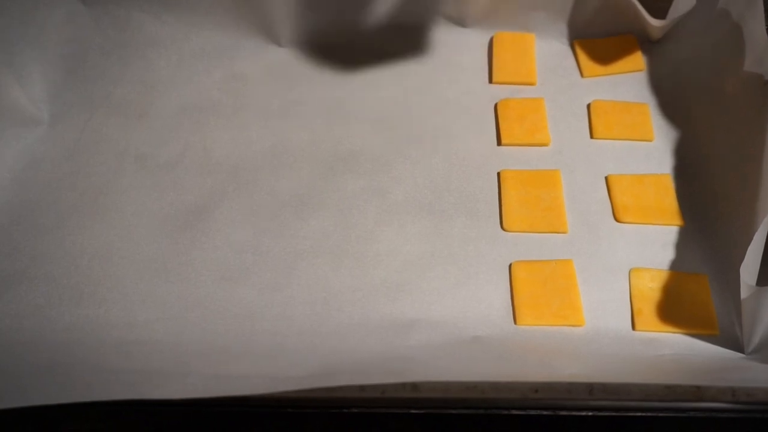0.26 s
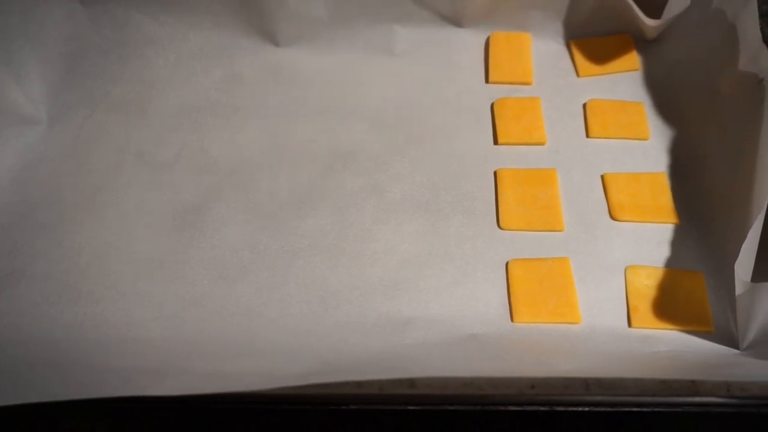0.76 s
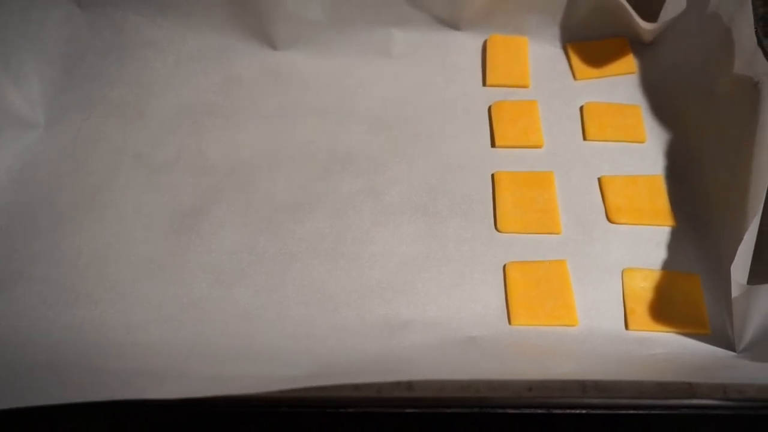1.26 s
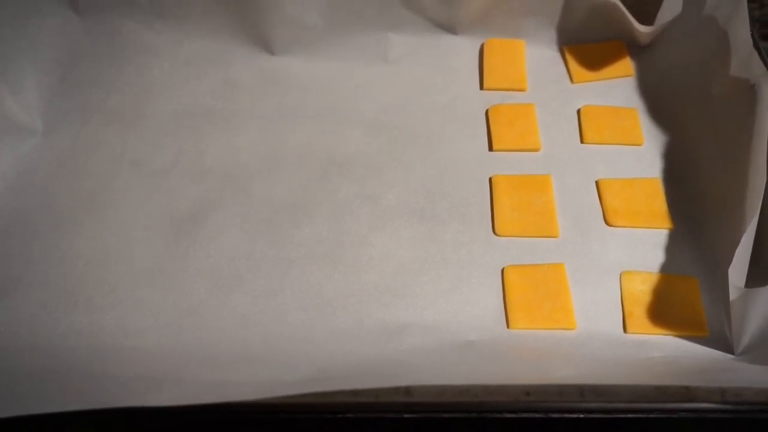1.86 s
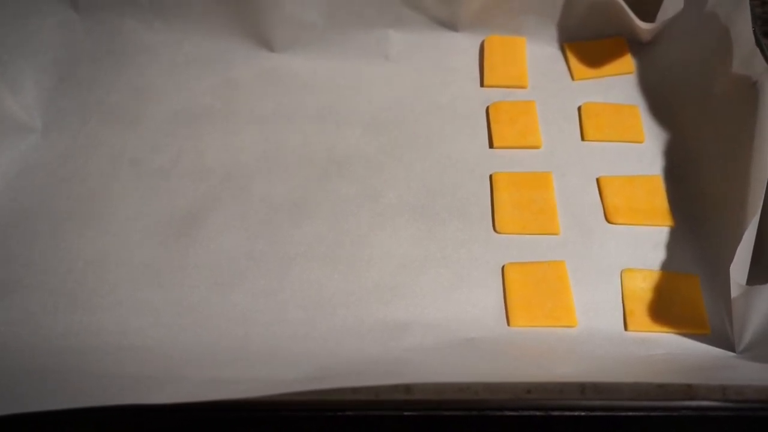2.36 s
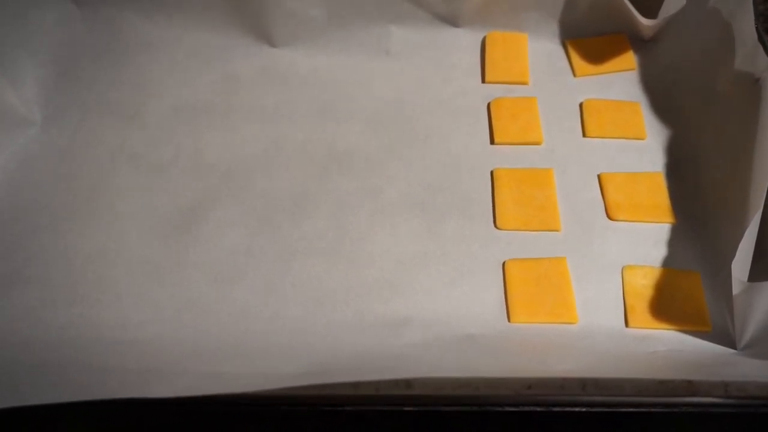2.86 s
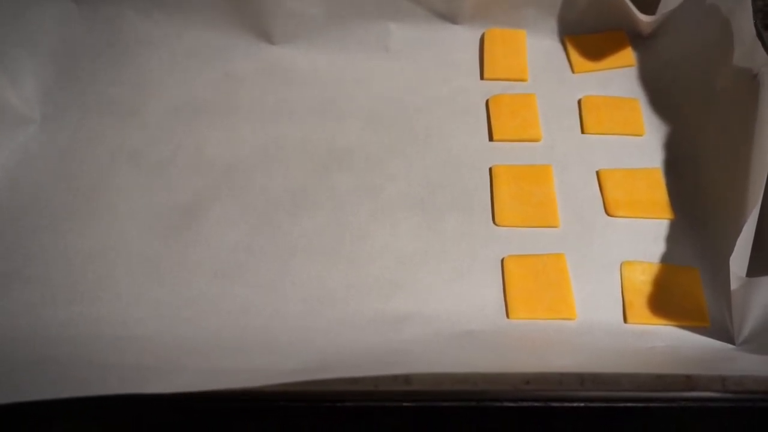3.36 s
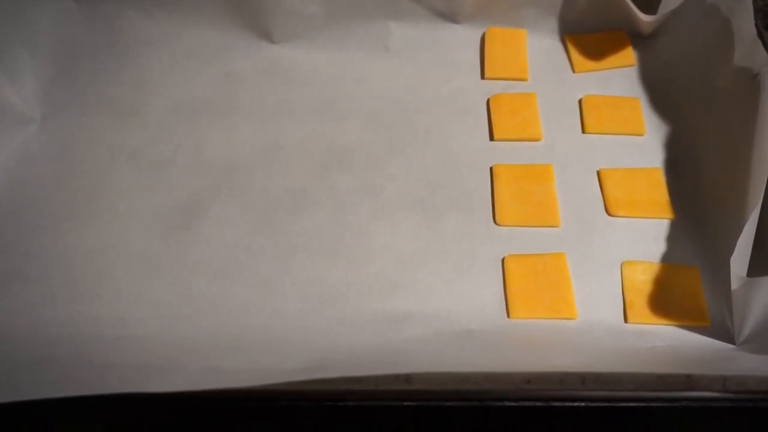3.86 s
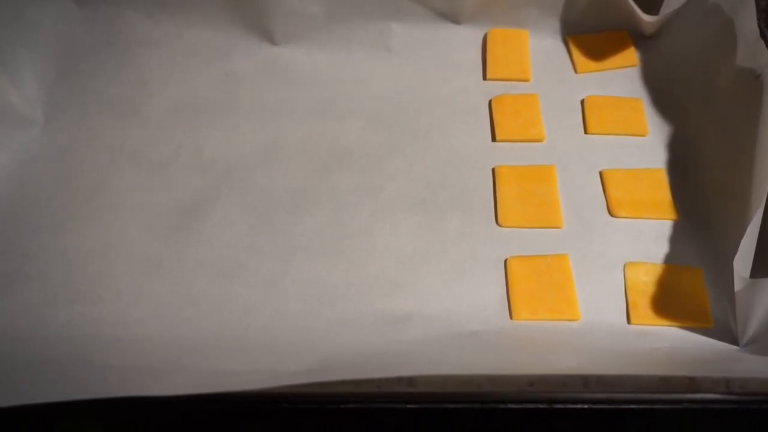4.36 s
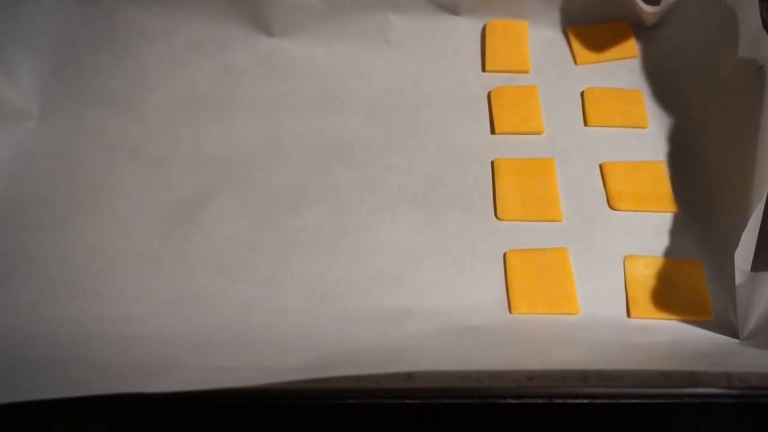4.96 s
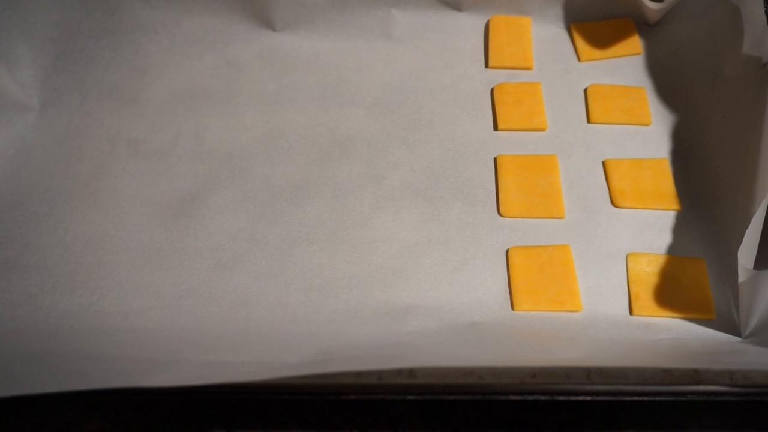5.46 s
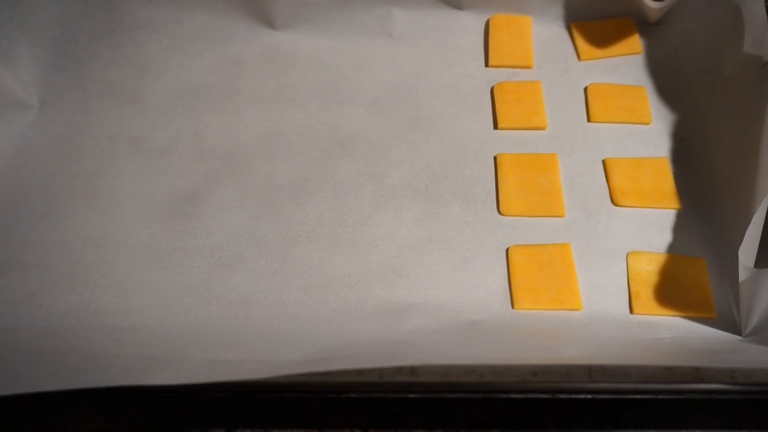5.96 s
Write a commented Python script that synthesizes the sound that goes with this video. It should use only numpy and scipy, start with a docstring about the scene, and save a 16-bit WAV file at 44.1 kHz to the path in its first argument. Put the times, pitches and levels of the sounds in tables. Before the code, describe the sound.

A quiet kitchen: soft air and a faint, wavering fridge hum run throughout, with short room reverberation. At about 0.1 s paper pops crisply, then again near 0.25 s together with dull low thuds of something set down, and a faint one at 0.4. From 0.7 to 2.4 s parchment slides softly with small dry ticks and brief scuffs, and a clearer snap at 1.7 s and more crackle around 2.1. A utensil clinks faintly twice at 2.5 to 2.6 s. Light creases at 2.9 lead to a lively burst of crackling and rustling from 3.3 to 3.65 s, then it thins. Around 4.5 to 4.85 s comes the densest, brightest crinkling, with a strong scuff, followed by a very sharp snap at 5.05. At 5.5 s a hard, loud double-contact knock clacks on the worktop, with a softer thud at 5.6, then reverberation fades into the hum.

```python
"""Small dough squares are handled on parchment paper beside a metal baking pan, in a kitchen with a humming fridge.
Wavering sine tones and coloured noise make the hum and air; random slips of fibres hiss as things slide on the paper.
Creases pop singly and in clusters as snaps that shake resonant panels; things set down knock as decaying modes
over a clack. Short scuffs ring single panels, and midway a utensil clinks twice with decaying modes.
Paper and utensil are heard directly, again from a nearby surface, then in the room; knocks directly and in the room."""
import sys
import numpy as np
from scipy import signal
from scipy.fft import rfft, irfft
from scipy.io import wavfile
from scipy.ndimage import uniform_filter1d

SR = 44100
rng = np.random.default_rng(int(sys.argv[2]) if len(sys.argv) > 2 else 0)


def dump_mix(stems):
    """Bounce the given channels to the path in sys.argv[1] as a 16-bit WAV at rate SR."""
    frames = np.atleast_2d(stems).T  # one column per channel
    limited = np.clip(frames, -1, 1)  # hard clip at full scale
    pcm = np.round(limited * 32767).astype(np.int16)
    wavfile.write(sys.argv[1], SR, pcm)


N = 273861

# Strokes of something sliding over the paper. Each row: start in seconds, length in seconds, level in dB,
# treble in dB relative to that level.
SLIDING_STROKES = [(-.04, 0.05, -49, -12), (0.683, 0.23, -59.5, 1), (0.948, 0.48, -60.5, 6),
                   (1.495, 0.5, -61.5, 2), (2.022, .19, -55, 4.5), (2.744, 0.19, -66, -1),
                   (2.916, 0.34, -58.5, -3.5), (3.338, 0.09, -46, -12), (3.498, 0.22, -49, -6.5),
                   (3.766, 0.13, -58, -1), (3.904, 0.13, -57, 0.5), (4.532, 0.2, -44, -2.5),
                   (4.907, 0.21, -54.5, 2), (5.035, 0.052, -56, 9.5), (5.478, 0.091, -51.5, 1.5)]
STROKE_ATTACK_S, STROKE_RELEASE_T60_S = 0.05, 0.41


def undb(db):
    """The decibel is logarithmic: 20 dB is a tenfold amplitude."""
    return 10 ** (np.asarray(db) / 20)


def unit(x):
    """Energy is the sum of squares: scale it to one, averaged over the channels."""
    return x / np.sqrt(np.mean(np.sum(x ** 2, axis=-1)))


def log_interp(f, hz, values):
    """Pitch is logarithmic in frequency: straight lines on a log-frequency axis."""
    return np.interp(np.log(np.maximum(f, 1)), np.log(hz), values)


def colour(x, points, size=2048):
    """Minimum phase: a folded cepstrum gives a causal filter through (Hz, dB) points."""
    gain_db = log_interp(np.fft.rfftfreq(size, 1 / SR), *np.transpose(points))
    cepstrum = irfft(np.log(undb(gain_db)))
    cepstrum[1:size // 2] *= 2
    cepstrum[size // 2 + 1:] = 0
    impulse_response = irfft(np.exp(rfft(cepstrum)))
    return signal.fftconvolve(x, impulse_response[None], axes=-1)[:, :x.shape[1]]


def fade(t, t60):
    """Linear damping gives exponential decay: 60 dB down after t60 seconds."""
    return np.exp(-np.log(1000) * t / t60)


def sides(pan_db):
    """Intensity stereo: left and right gains that differ by pan_db at constant energy."""
    gains = undb(np.array([[pan_db], [-pan_db]]) / 2)
    return gains / np.sqrt(np.mean(gains ** 2))


def add(track, s, x):
    """Superposition: mix x in at time s in seconds."""
    i = max(int(s * SR), 0)
    track[:, i:i + x.shape[1]] += x[:, :N - i]


def diffuse(size, alike_hz=950):
    """Diffuse-field coherence: noise alike in both channels in the bass, unrelated in the treble."""
    mid, side = rfft(rng.standard_normal((2, size)))
    alike = np.exp(-(np.fft.rfftfreq(size, 1 / SR) / alike_hz) ** 2)
    common = mid * np.sqrt(1 + alike)
    opposed = side * np.sqrt(1 - alike) * np.array([[1], [-1]])
    return irfft(common + opposed, size) / np.sqrt(2)


def walk(rate):
    """Low-pass noise: a random wander with a spread near 1 and about rate new values a second."""
    k = int(SR / rate)
    steps = np.repeat(rng.standard_normal(N // k + 1), k)[:N]
    return uniform_filter1d(steps, k)


def panel(x, hz, q):
    """A stiff patch of paper is a damped resonator with one mode."""
    return signal.lfilter(*signal.iirpeak(min(hz, SR / 3), max(q, 1), fs=SR), x)


def ringing(modes, t, apart_hz=2500):
    """Modal superposition: decaying sines, the high ones in different phases in the two channels."""
    tones = []
    for hz, db, t60 in modes:
        phase = min(hz / apart_hz, 1) * rng.standard_normal((2, 1))
        tones.append(undb(db) * fade(t, t60) * np.sin(2 * np.pi * hz * t + phase))
    return sum(tones)


def slips(size, rate, spread_db):
    """Stick-slip: fibres catch and let go in tiny clicks at random, a few much larger than the rest."""
    sizes = undb(spread_db * np.minimum(rng.exponential(size=size), 5))
    return (rng.random(size) < rate / SR) * sizes * rng.standard_normal((2, size))


def fridge(air_rms_db=-59, waver_db=3.0, drift_hz=1.336, pan_db=-2.0):
    """Slow modulation: compressor lines waver in level and pitch over soft air noise."""
    # Fridge hum. Each row: frequency in Hz, rms level in dB before the waver and swell.
    hum_lines = [(177.6, -87), (296.1, -71), (415, -77), (475, -69)]
    # Spectrum of the kitchen air. Each row: frequency in Hz, relative density in dB per Hz.
    air_spectrum = [(18, -89), (30, -42.5), (145, -30.5), (170, -24.5), (259, -16.5), (295, -16),
                    (345, -11.5), (473, -10.5), (632, -19), (1040, -17.5), (1910, -20), (2680, -19),
                    (3870, -23), (8520, -23.5), (16000, -29)]
    # Slow swelling and sinking of hum and air. Each row: time in seconds, gain in dB.
    swell = [(0, 1), (1.2, 2.5), (2.6, 1), (3.2, 2), (4.5, 3.5), (5.3, -1.5), (6.2, -2)]
    air = unit(colour(diffuse(N), air_spectrum)) * np.sqrt(N) * undb(air_rms_db)
    hum = 0
    for hz, db in hum_lines:
        level = np.sqrt(2) * undb(db + waver_db * walk(7.1))
        phase = 2 * np.pi * np.cumsum(hz + drift_hz * walk(13)) / SR
        hum = hum + level * np.sin(phase)
    swell_db = np.interp(np.arange(N) / SR, *np.transpose(swell))
    return (air + hum) * undb(swell_db) * sides(pan_db)


def stroke(start, length):
    """Friction noise follows speed: a stroke gathers speed, holds it and dies away."""
    t = np.arange(N) / SR - start
    attack = np.clip(t / STROKE_ATTACK_S, 0, 1)
    return attack * fade(np.clip(t - length, 0, 1), STROKE_RELEASE_T60_S)


def sliding(grain_db=2.5, rate=4000, flutter_db=4.8, low_mid_db=-6, pan_db=-2.0):
    """Friction: dense slips hiss in the low-mid, middle and treble of the sheet; the pressure flutters."""
    start, length, db, treble_db = np.transpose(SLIDING_STROKES)
    motion = np.array([stroke(*row) for row in zip(start, length)])
    low_mid = [(200, -28.5), (600, -7.5), (950, -10.5), (1600, -3.5), (2600, -34.5), (6000, -29)]
    middle = [(600, -52.0), (1400, -9), (2300, -2.5), (4000, -3.0), (5500, -7.0), (9000, -30.5)]
    treble = [(2000, -60.0), (4500, -8), (6500, -3.5), (11500, -5.0), (15500, -11.5)]
    out, pressure = 0, walk(45)
    for band_db, shape in [(db + low_mid_db, low_mid), (db, middle), (db + treble_db, treble)]:
        grains = unit(colour(slips(N, rate, grain_db), shape)) * np.sqrt(N)
        # where strokes overlap the loudest one counts
        loudness = np.max(undb(band_db)[:, None] * motion, axis=0)
        out = out + grains * loudness * undb(flutter_db * pressure)
    return out * sides(pan_db)


def small_creases(scatter_db=0.5, treble_db=-4.0, panel_hz=4200., spread_octaves=0.86, count=3):
    """Buckling under load: every stroke trips a few faint creases, louder the harder it presses."""
    above_stroke_db, shiver_t60, pan_db = 23., .006, -8.
    rows = []  # columns as in crease_pops
    for s, length, db, _ in SLIDING_STROKES:
        for when, (strength, width) in zip(rng.random(count), rng.standard_normal((count, 2))):
            pop_s = s + STROKE_ATTACK_S + when * length
            pop_db = db + above_stroke_db + scatter_db * strength
            hz = panel_hz * 2 ** (spread_octaves * width)
            rows.append((pop_s, pop_db, treble_db, hz, shiver_t60, pan_db))
    return rows


def creases(body_db=-12, top_db=-9, panel_db=-3.0, panel_q=4.7,
            chain_db=-4.5, chain_rate=220, chain_spread_db=5.0, chain_t60=0.23,
            lead_in_db=-15., lead_in_t60=0.016, size=6000, count=5):
    """Impulse response of a resonator: noise swells briefly, then one snap and a shivering panel.
    Returns the direct sound and what is sent into the room from several spots on the sheet."""
    # Louder creases popping. Each row: time in seconds, energy in dB, treble in dB relative to 3 kHz,
    # panel resonance in Hz, shiver t60 in seconds, left minus right in dB.
    crease_pops = [(0.102, 0, 0.5, 3230, 0.091, -5), (0.255, -4.5, 0, 3270, 0.055, -3),
                   (0.284, -4, 0.5, 1550, 0.052, -7), (1.0523, -14, 5, 6960, 0.013, -12),
                   (1.09, -16, -6, 12000, 0.003, -11), (1.225, -13.5, -21, 2750, 0.031, -7),
                   (1.463, -18, 7, 5700, 0.0064, -5), (1.7323, -4.5, -3.5, 7100, 0.016, -8),
                   (2.1131, -11, -11, 3770, .004, -15), (2.155, -8, -3, 3220, 0.0025, 0),
                   (2.405, -25, -2, 5000, 0.0099, -7), (2.4255, -23, -8, 6300, 0.0087, -9),
                   (2.924, -13, 4, 3000, 0.29, -6), (2.9475, -14.5, -12, 6950, 0.041, -2),
                   (3.0438, -18.5, -2.5, 1480, 0.011, -3), (3.2852, -12.5, -5, 1980, 0.01, -3),
                   (3.349, -2, -4, 2780, 0.012, -10), (3.3725, -2.5, -4, 3460, 0.0079, -8),
                   (3.432, -5.5, -20, 1410, 0.019, 0), (3.4849, -2.5, -4, 1500, 0.0039, -5),
                   (3.5148, -5.5, -17, 1000, 0.0094, -4), (3.6, -3, -1.5, 2570, 0.011, -2.5),
                   (3.6447, -10.5, -4, 5070, .004, -5), (3.854, -20, -3, 4900, 0.01, -9),
                   (4.0541, -16.5, -13, 4040, 0.0075, -12), (4.2699, -10, -30, 2210, 0.062, -6),
                   (4.2872, -7.5, -11, 2360, 0.0036, -17), (4.4938, -17.5, -32, 2180, 0.013, -14),
                   (4.5191, -4.5, 2.5, 2230, 0.009, -6), (4.5557, -9.5, -3.5, 5300, 0.008, -6),
                   (4.5964, -8.5, -9, 2300, .003, -6), (4.609, -0.5, 6, 7640, 0.0032, -3),
                   (4.64, 0.5, 0.5, 2700, 0.0044, -5), (4.6563, -6, -10, 3350, 0.0029, -14),
                   (4.7613, -10.5, 1, 2520, 0.0025, -3), (4.7943, -11.5, 2, 7600, 0.005, -12),
                   (4.8008, -6.5, -10, 3340, 0.0069, -11), (4.82, -8.5, 1.5, 915, 0.02, -24),
                   (5.038, -11, 8, 12600, .004, 12), (5.045, 1, 6, 9900, .003, -9),
                   (5.073, -12.5, 2, 7450, .005, 5), (5.0966, -13.5, -7, 5470, 0.0058, -9),
                   (5.4623, -18.5, -14, 4000, 0.019, -16)]
    # a middling pop of a middling panel, and the low-mid it carries relative to 3 kHz
    middling_hz, middling_t60, middling_low_db = 3000, 0.012, -2.5
    # wide panels are deep and shiver long: low-mid in dB per octave down, per doubling of the shiver
    deep_panel_db, long_shiver_db = 8.5, 2.
    # a shiver this long (s) reaches the neighbouring panels and doubles the width of the resonance
    blur_t60 = 0.054
    # dull pops spread all around; above this much treble they beam and excite the room less
    pop_room_db, beaming_treble_db, beaming_db_per_db = -2, 1, 1.37
    snap = 4.5  # relative to the rms of the noise where the shiver starts
    direct, spots = np.zeros((2, N)), np.zeros((count, 2, N))
    lead = size // 20
    t = (np.arange(size) - lead) / SR  # the snap falls at zero
    for k, (s, db, high_db, hz, t60, pan_db) in enumerate([*crease_pops, *small_creases()]):
        shiver_t60 = max(t60, 1e-3)
        low_db = (middling_low_db + deep_panel_db * np.log2(middling_hz / hz)
                  + long_shiver_db * np.log2(shiver_t60 / middling_t60))
        room_db = pop_room_db - beaming_db_per_db * max(high_db - beaming_treble_db, 0)
        lead_in = undb(lead_in_db) * fade(abs(t), lead_in_t60)
        envelope = np.where(t < 0, lead_in, fade(abs(t), shiver_t60))
        push = rng.standard_normal((2, size)) * envelope
        push[:, lead] = snap
        # the snap sets off smaller creases nearby
        chain = slips(size, chain_rate, chain_spread_db) * fade(abs(t), chain_t60) * (t > 0)
        push += undb(chain_db) * chain
        shape = [(120, low_db - 48), (560, low_db + body_db), (1000, low_db), (1500, low_db), (2300, 0),
                 (3600, 0), (7000, high_db), (11500, high_db), (15500, high_db + top_db)]
        resonance = panel(push, hz, panel_q / (1 + t60 / blur_t60))
        pop = unit(unit(colour(push, shape)) + undb(panel_db) * unit(resonance)) * undb(db)
        add(direct, s + t[0], pop * sides(pan_db))
        add(spots[k % count], s + t[0], pop * undb(room_db))
    return direct, spots


def knocks(contact_db=-8.0, clack_db=7.5, clack_t60=0.034, pan_db=1.0, low_hz=245, size=22050):
    """Impact excitation: a blow rings modes over a short clack; a softer contact leaves only the low ones."""
    # Things set down on the worktop. Each row: time in seconds, energy in dB, contact cut-off in Hz.
    blows = [(.233, -8, 570), (.239, -12.5, 750), (0.389, -21.5, 400), (4.821, -33, 885),
             (5.318, -28.5, 400), (5.412, -23, 900), (5.5043, 6.5, 3530), (5.5082, 2.5, 1920),
             (5.618, -11.5, 800)]
    # Modes of the worktop and the things on it. Each row: frequency in Hz, level in dB, t60 in seconds.
    worktop_modes = [(291, -64, 0.16), (359.2, 6, 0.15), (400, 1, 0.048), (494, 3.5, 0.04), (627, 7, 0.038),
                     (658, -26, 0.41), (860, 4, 0.038), (942, 0.5, 0.13), (1023, 0, 0.05), (1107, -8, 0.22),
                     (1265, -20, 0.089), (1650, -3, 0.084), (1670, 0, 0.079), (1934, 16.5, 0.013),
                     (2193, 10, 0.052), (2650, 7, .025), (3360, 6.5, 0.049), (4620, 14, 0.019)]
    # Spectrum of the clack of a blow. Each row: frequency in Hz, gain in dB.
    clack_spectrum = [(130, 0), (240, -42.5), (390, 10.5), (620, -8.5), (1050, 6.5), (1500, -3), (3000, 3),
                      (5500, -8.5), (9000, -7.5), (15000, 0)]
    out, t = np.zeros((2, N)), np.arange(size) / SR
    ring = unit(ringing(worktop_modes, t))
    # a small object radiates hardly any bass
    bass_cut = signal.butter(3, low_hz, "high", fs=SR, output="sos")
    for s, db, hz in blows:
        # one firm contact, then a brief chatter as the faces settle
        contact = unit(diffuse(size) * fade(t, clack_t60)) + undb(contact_db) * (t == 0)
        clack = colour(contact, clack_spectrum)
        softness = signal.butter(2, hz, fs=SR, output="sos")
        blow = signal.sosfilt(softness, ring + undb(clack_db) * unit(clack))
        blow = signal.sosfilt(bass_cut, blow)
        add(out, s, unit(blow) * undb(db) * sides(pan_db))
    return out


def scuffs(rate=1500, grain_db=5.0, q=2.4, pan_db=-2.5):
    """Stick-slip excitation of a resonator: a swelling and sinking run of slips rings one panel."""
    # Short scuffs. Each row: start in seconds, length in seconds, level in dB, panel resonance in Hz.
    scuff_runs = [(0.811, 0.055, -55, 1780), (1.191, 0.023, -50.5, 2720), (1.4, 0.038, -50, 2800),
                  (1.789, 0.041, -52, 2500), (2.042, 0.082, -53.5, 3700), (2.127, 0.07, -47, 2730),
                  (2.979, 0.06, -55, 2820), (3.52, 0.11, -43.5, 1400), (4.1, 0.065, -54.5, 4170),
                  (4.222, 0.041, -52.5, 2190), (4.46, 0.087, -45.5, 2160), (4.595, 0.099, -39.5, 2370)]
    out = np.zeros((2, N))
    for s, length, db, hz in scuff_runs:
        size = int(length * SR)
        run = slips(size, rate, grain_db) * np.sqrt(np.hanning(size))
        rung = panel(panel(run, hz, q), hz, q)
        add(out, s, unit(rung) * np.sqrt(size) * undb(db))
    return out * sides(pan_db)


def clinks(pan_db=-12.0, size=6000):
    """Free vibration: a utensil is nudged and rings briefly in its modes."""
    # Light clinks. Each row: time in seconds, energy in dB.
    nudges = [(2.5237, -22.5), (2.5907, -31)]
    # Modes of the utensil. Each row: frequency in Hz, level in dB, t60 in seconds.
    utensil_modes = [(1960, 3, 0.035), (3230, 0, .022), (3920, 0, 0.019)]
    out = np.zeros((2, N))
    for s, db in nudges:
        add(out, s, unit(ringing(utensil_modes, np.arange(size) / SR)) * undb(db))
    return out * sides(pan_db)


def near_path(x, echo_s=.0054, echo_db=-11.0, lag_samples=4):
    """Reflection and arrival time: a nearby surface repeats the sound; the left channel hears it later."""
    out = x.copy()
    add(out, echo_s, x * undb(echo_db))
    return np.array([np.roll(out[0], lag_samples), out[1]])


def kitchen(x, early_db=3.0, early_t60=0.16, gap_s=0.004, pan_db=0.5, size=30000):
    """Reverberation: cupboards return quick dense echoes, the walls a longer tail; each band decays alone."""
    # Kitchen reverberation. Each row: band centre in Hz, level in dB, t60 in seconds.
    room_bands = [(149, -6, 0.32), (400, -1, 0.59), (1000, 5, 0.6), (2500, 2.5, 0.58), (6500, 2.5, 0.46),
                  (10200, 1, 0.36), (16800, -2, 0.57)]
    t = np.arange(size) / SR
    f, noise = np.fft.rfftfreq(size, 1 / SR), rfft(diffuse(size))
    hz, dbs, t60s = np.transpose(room_bands)
    response = 0
    # each share is 1 at its own band and 0 at the others
    for share, db, t60 in zip(np.eye(len(hz)), dbs, t60s):
        decay = fade(t, t60) + undb(early_db) * fade(t, early_t60)
        envelope = decay * np.minimum(t / gap_s, 1) ** 2
        band = irfft(noise * log_interp(f, hz, share), size)
        response = response + band * unit(envelope) * undb(db)
    return signal.fftconvolve(x, response, axes=-1)[:, :N] * sides(pan_db)


def scene(slide_room_db=-3.5, knock_room_db=-1.0):
    """Superposition: paper, utensil and knocks, near and through the room, over the fridge."""
    # Tone of the left channel for all but the fridge and air. Each row: frequency in Hz, gain in dB.
    left_tone = [(300, -2.5), (600, -4), (1200, -5), (2500, -7), (5000, -3.5), (9000, 2), (15000, -4.5)]
    background = fridge()
    slides = sliding()
    pops, spots = creases()
    blows = knocks()
    small = slides + scuffs() + clinks()
    # every spot has its own paths through the room
    sends = [*spots, undb(slide_room_db) * small, undb(knock_room_db) * blows]
    room = sum(kitchen(x) for x in sends)
    work = near_path(pops + small) + blows + room
    return np.vstack([colour(work[:1], left_tone), work[1:]]) + background


def record(dry, top_hz=16000):
    """Band limiting: a steep elliptic low-pass cuts the top."""
    return signal.sosfilt(signal.ellip(8, .2, 70, top_hz, fs=SR, output="sos"), dry)


dry = scene()
out = record(dry)
dump_mix(out)
```